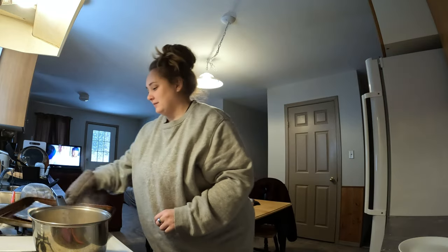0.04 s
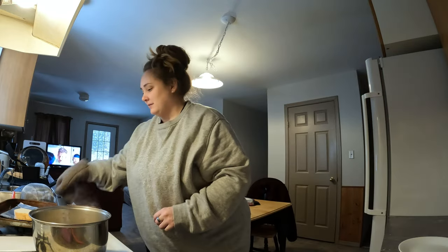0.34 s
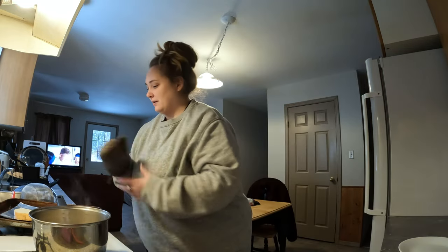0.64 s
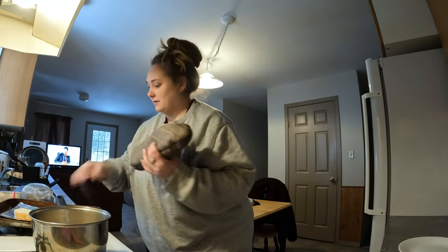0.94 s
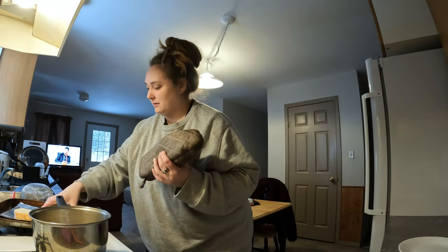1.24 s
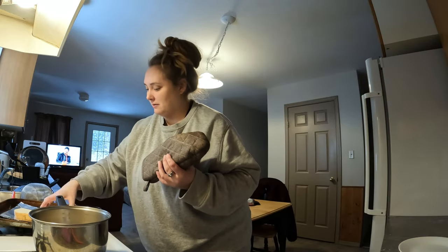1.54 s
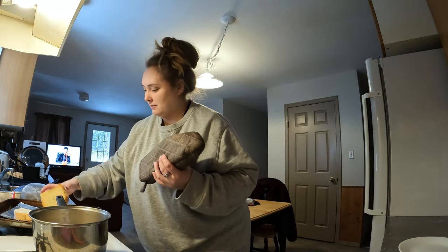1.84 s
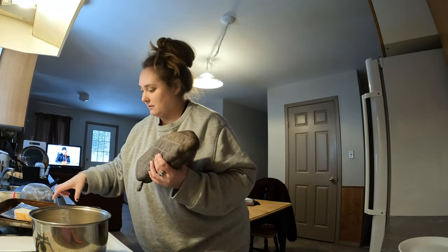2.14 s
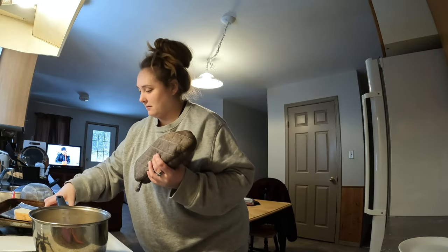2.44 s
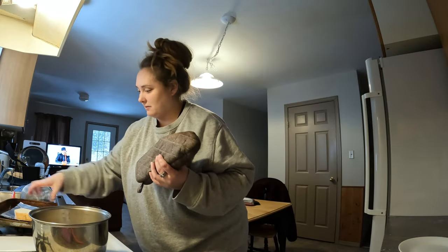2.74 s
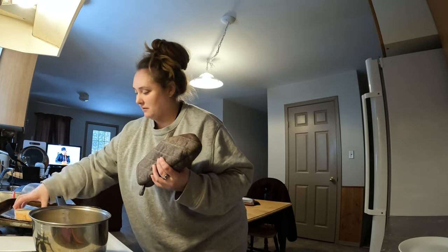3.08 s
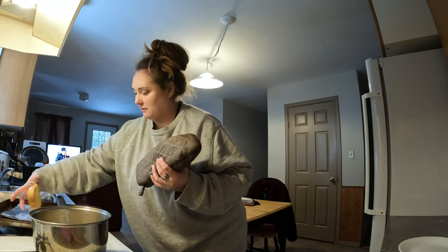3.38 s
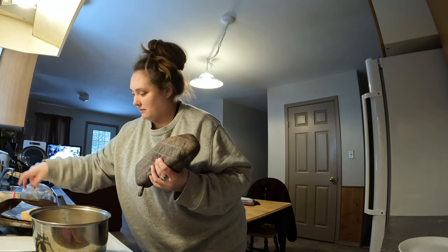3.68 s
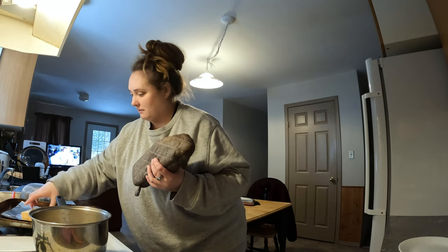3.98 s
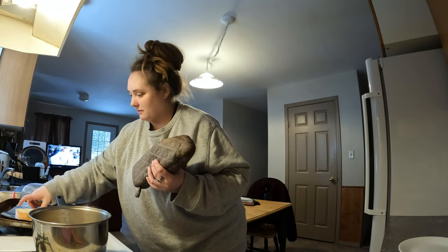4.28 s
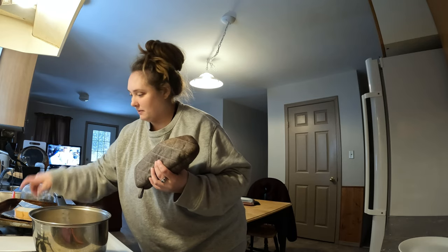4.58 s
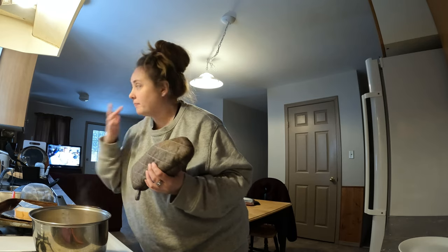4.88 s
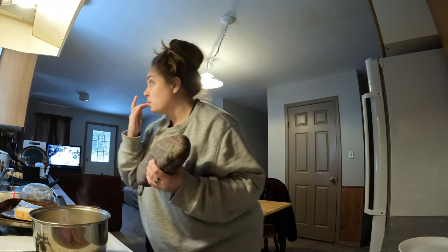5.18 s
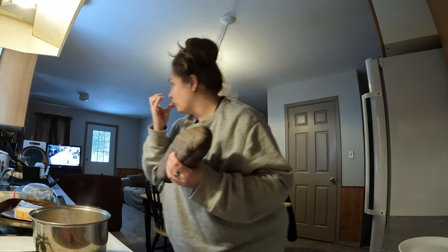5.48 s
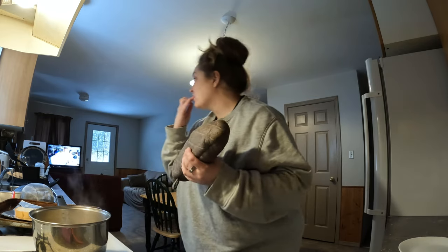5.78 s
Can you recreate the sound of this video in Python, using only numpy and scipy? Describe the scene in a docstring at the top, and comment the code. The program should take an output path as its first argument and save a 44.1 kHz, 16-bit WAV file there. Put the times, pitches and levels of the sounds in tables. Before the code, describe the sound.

A metal baking tray clatters on a kitchen counter, then paper crinkles, butter knocks twice into a pot, and lips smack softly.

```python
"""A metal baking tray, knocked by a spatula, clatters on a kitchen counter and rocks to rest.
Each blow is a crash of dense sheet modes, a ring and a counter thump. Butter is picked off crinkly
paper and two pieces knock into a damped steel pot; the paper drags, the butter dish ticks, and lips
suck and smack on a fingertip. The kitchen is small and hard, with a low appliance drone."""
import sys
import numpy as np
from scipy import signal
from scipy.fft import rfft, irfft, next_fast_len
from scipy.io import wavfile

SR = 44100
rng = np.random.default_rng(int(sys.argv[2]) if len(sys.argv) > 2 else 0)


def transcribe(u):
    """Save the signal u as a 16-bit wav file named by the first command-line argument.

    u: samples, shape (n,) or (channels, n), limited to [-1, 1]; the rate is SR.
    q: integer samples, one column per channel.
    """
    v = np.clip(np.atleast_2d(u).T, -1, 1)
    q = np.round(v * 32767).astype(np.int16)
    wavfile.write(sys.argv[1], SR, q)


N = 256662
TIME = np.arange(N) / SR
HZ = np.maximum(np.fft.rfftfreq(N, 1 / SR), 1)

# strongest tray modes: (frequency [Hz], relative level [dB], t60 [s])
TRAY_MODES = [(347, 6.5, .2), (542, 11.5, 0.21), (1182, -1.5, 0.3), (1276, -1.5, 0.35), (1476, 5, 0.17),
              (1570, -4, 0.35), (1915, -9, 0.65), (2204, 1.5, 0.2), (2576, 1.5, 0.1), (2720, -1, 0.1),
              (2920, -1, 0.1165), (3540, -1.5, 0.11), (3730, -4, 0.083), (4100, -17, .25),
              (4198, -12, 0.18), (4540, -21, 0.62), (4550, -17, 0.18)]


def undb(db):
    """Decibels to gain."""
    return 10 ** (np.asarray(db) / 20)


def unit(x):
    """Scale to rms 1."""
    return x / np.sqrt(np.mean(x ** 2) + 1e-18)


def add(out, start_s, x):
    """Mix x in at start_s."""
    i = max(int(start_s * SR), 0)
    out[i:i + len(x)] += x[:N - i]


def convolve(x, response):
    """Convolve with a response scaled to unit energy."""
    return signal.fftconvolve(x, response / np.linalg.norm(response))[:N]


def butter(x, hz, kind):
    """Second-order low-pass or high-pass."""
    return signal.sosfilt(signal.butter(2, hz, kind, fs=SR, output="sos"), x)


def colour(x, points, tilt_db_oct=0):
    """Minimum-phase (Hz, dB) filter, tilted above 400 Hz; white noise keeps its power."""
    size = next_fast_len(len(x) // 2 + 1024) * 2
    octave = np.log2(np.maximum(np.fft.rfftfreq(size, 1 / SR), 20))
    hz, db = np.transpose(points)
    curve_db = np.interp(octave, np.log2(hz), db) + tilt_db_oct * np.maximum(octave, np.log2(400))
    cepstrum = irfft(np.log(unit(undb(curve_db))))
    cepstrum[1:size // 2] *= 2
    cepstrum[size // 2 + 1:] = 0
    return irfft(rfft(x, size) * np.exp(rfft(cepstrum)))[:len(x)]


def band(hz, width_hz):
    """Noise in one resonance, rms 1."""
    return unit(irfft(rfft(rng.standard_normal(N)) / (1 + (2 * (HZ - hz) / width_hz) ** 2), N))


def grains(size, per_s, spread_db):
    """Random clicks, a few much larger than the rest; rms 1."""
    present = rng.random(size) < per_s / SR
    sign = rng.choice([-1, 1], size)
    strength = np.minimum(rng.exponential(size=size), 4)
    return unit(present * sign * undb(spread_db * strength))


def fade(t, t60_s):
    """Exponential decay."""
    return np.exp(-np.log(1000) * t / t60_s)


def ring(modes, detune, favoured_hz, focus_db_oct):
    """Damped modes, weighted toward favoured_hz; each beats with a weaker partner."""
    hz, db, t60_s = np.transpose(modes)[:, :, None]
    t = TIME[:SR]
    gain = undb(db - focus_db_oct * np.abs(np.log2(hz / favoured_hz)))
    partner_hz = hz + detune * np.sqrt(hz) * rng.standard_normal(hz.shape)
    main, partner = (np.sin(2 * np.pi * (f * t + rng.random(hz.shape))) for f in (hz, partner_hz))
    return (gain * (main + partner / 2) * fade(t, t60_s)).sum(0) / np.linalg.norm(gain)


def drone():
    """Appliances hum in the room's low resonances over a faint, wavering hiss."""
    # drone spectrum: (frequency [Hz], relative density [dB])
    spectrum = [(25, -30.5), (85, -8.5), (140, -4), (270, -3.5), (420, -12.5), (600, -13), (900, -19.5),
                (1250, -14.5), (2300, -24), (6600, -36), (9200, -46.5), (11700, -35.5), (14000, -60.5)]
    # room resonances: (frequency [Hz], width [Hz], level [dB])
    booms = [(95, 40, -66), (176.6, 5.8, -60), (278, 53, -60)]
    air_db = -52.5 + 0.5 * band(0, width_hz=6)
    air = colour(rng.standard_normal(N), spectrum) * undb(air_db)
    return air + sum(undb(db) * band(hz, width_hz) for hz, width_hz, db in booms)


def kitchen(x, wet_db, low_t60_s, high_t60_s):
    """Add dense echoes from cupboards and walls; the treble dies first."""
    t = TIME[:SR]
    echoes = grains(SR, per_s=6000, spread_db=1.7) * (1 - np.exp(-(t / 0.0045) ** 2))
    low = butter(echoes, 2500, "low") * fade(t, low_t60_s)
    high = butter(rng.permutation(echoes), 2500, "high") * fade(t, high_t60_s)
    return x + undb(wet_db) * convolve(x, low + high)


def dish(t60_s):
    """The butter dish ticks under the fingers: short, hand-damped rings."""
    # dish ticks: (time [s], level [dB], pitch [Hz])
    ticks = [(1.712, -47, 4930), (2.599, -49, 2870), (2.603, -50, 2480)]
    out = np.zeros(N)
    for s, db, hz in ticks:
        add(out, s, undb(db) * ring([(hz, 0, t60_s)], detune=1.8, favoured_hz=hz, focus_db_oct=0))
    return out


def lips():
    """Suction hisses in two resonances of a narrowing wet gap; the lips smack before and on parting."""
    # lip smacks: (time [s], level [dB], tilt [dB/oct])
    smacks = [(5.2373, -46.5, 8), (5.6237, -28.5, 4.5)]
    # wet lip spectrum: (frequency [Hz], relative density [dB])
    spectrum = [(300, 6), (1100, -2), (1600, 5.5), (2800, 3.5), (4200, -3), (6000, -0.5), (8000, -15),
                (11500, -20.5), (14000, -41)]
    close_s, slip_s, part_s = 5.29, 5.485, 5.615
    attack_s, slip_width_s, rise_db_per_s = 0.046, 0.055, 32
    narrowed = (1 + np.tanh((TIME - slip_s) / slip_width_s)) / 2  # the fingertip slips out
    whistle = (1 - narrowed) * band(5150, width_hz=300) + narrowed * band(6400, width_hz=900)
    fizz = colour(grains(N, per_s=4000, spread_db=2.6), spectrum)
    suction = np.clip((TIME - close_s) / attack_s, 0, 1)
    suction *= undb(-rise_db_per_s * np.maximum(part_s - TIME, 0))
    suction *= fade(np.maximum(TIME - part_s, 0), t60_s=0.35)
    out = suction * (undb(-54.5) * whistle + undb(-51) * fizz)
    t = TIME[:SR // 8]
    for s, db, tilt in smacks:
        burst = rng.standard_normal(len(t)) * fade(t, t60_s=0.035)
        add(out, s, undb(db) * colour(burst, spectrum, tilt))
    return out


def strokes(rows):
    """Gain of hand strokes: each presses in and eases off along an arch."""
    return sum(undb(db) * np.sin(np.pi * np.clip((TIME - s) / length_s, 0, 1)) ** 1.04
               for s, length_s, db in rows)


def paper():
    """Creases snap in click showers, fingers rustle, and dragging adds a dull stick-slip scrape."""
    # crease snaps: (time [s], level [dB], tilt [dB/oct], length [s])
    crinkles = [(1.463, -45, 1, 0.027), (1.563, -45, -1.5, 0.02), (1.7, -51, -4.5, 0.048),
                (1.967, -34, 0, 0.039), (1.984, -39.5, 16, 0.086), (2.562, -48.5, 2.5, 0.032),
                (2.596, -48.5, -5, 0.016), (2.838, -56.5, 9.5, 0.0093), (3.172, -52.5, 3.5, 0.018),
                (3.271, -45.5, -6, 0.033), (3.342, -47, 0, 0.02), (3.392, -41, -2, 0.012),
                (3.552, -32.5, -2.5, 0.038), (4.386, -44.5, 0, 0.028), (4.428, -47, -1.5, 0.025)]
    # paper spectrum: (frequency [Hz], relative density [dB])
    spectrum = [(200, -19), (600, -10), (1500, 4.5), (3000, 0.5), (5500, 3.5), (7500, 1), (9200, -7.5),
                (11500, 3.5), (13000, -11.5), (15000, -40)]
    # finger strokes: (start [s], length [s], level [dB])
    handling = [(1.42, .13, -50), (1.53, 0.23, -58), (2.48, 0.087, -59.5), (2.59, 0.085, -58),
                (3.15, .15, -53.5), (3.32, 0.098, -56.5), (3.5, 0.056, -57.5), (4.1, 0.33, -53),
                (4.37, 0.13, -52.5)]
    # drags over the tray: (start [s], length [s], relative level [dB])
    drags = [(3.23, 0.14, -44), (3.32, .23, -46.5), (4.16, 0.24, -42), (4.37, 0.13, -43.5)]
    # scrape spectrum: (frequency [Hz], relative density [dB])
    drag_spectrum = [(150, -24), (270, 4.5), (420, -10.5), (620, -1.5), (800, -13), (1500, -8),
                     (2400, -13.5), (4500, -28), (9000, -37)]
    out, t = np.zeros(N), TIME[:SR // 4]
    for s, db, tilt, length_s in crinkles:
        envelope = np.exp(-(t / length_s) ** 2) * (1 - np.exp(-t / 0.0035))
        shower = grains(len(t), per_s=5000, spread_db=1.3) * envelope
        add(out, s, undb(db) * colour(shower, spectrum, tilt))
    rustle = colour(grains(N, per_s=3300, spread_db=1.9) * strokes(handling), spectrum, tilt_db_oct=-1.4)
    scrape = colour(grains(N, per_s=1300, spread_db=1.4) * strokes(drags), drag_spectrum)
    return out + rustle + undb(-3) * scrape


def strikes(hits, modes, spectrum, detune, focus_db_oct, weight, contact_s, crash_t60_s,
            tail_db, tail_t60_s):
    """Each blow: a crash of dense modes, a duller tail, the object's ring and a counter thump."""
    # counter modes: (frequency [Hz], relative level [dB], t60 [s])
    counter_modes = [(81, -14, 1), (111, -16.5, 0.65), (144.7, -8.5, 0.35), (176.7, -1.5, 0.2),
                     (255.5, -3, 0.46), (303, 1.5, 0.19), (355.5, 5.5, .2), (388.3, -3, 0.23)]
    out, t = np.zeros(N), TIME[:SR]
    for s, db, tilt, ring_db, favoured_hz, thump_db in hits:
        crash = colour(grains(SR, per_s=9000, spread_db=2.64) * fade(t, crash_t60_s), spectrum, tilt)
        tail = colour(rng.standard_normal(SR) * fade(t, tail_t60_s), spectrum, tilt - 1.5)
        body = ring(modes, detune, favoured_hz, focus_db_oct) * (1 - np.exp(-t / 0.0015))
        # the counter responds slowly; only a heavy object reaches its deepest modes
        thump = ring(counter_modes, detune=0.98, favoured_hz=306, focus_db_oct=0.7 / weight)
        thump *= 1 - np.exp(-t / 0.0088)
        blow = crash + undb(tail_db) * tail + undb(ring_db) * body + undb(thump_db - 2) * thump
        rise_s = contact_s * undb(-0.3 * (db + 20.5))  # gentler blows stay in contact longer
        add(out, s, undb(db) * blow * (1 - np.exp(-t / rise_s)))
    return out


def pot(t60_s):
    """Butter slaps the base of a steel pot; the spot hit decides which modes ring."""
    # knocks: (time [s], level [dB], tilt [dB/oct], ring [dB], favoured pitch [Hz], relative thump [dB])
    hits = [(2.018, -21, 0.5, -1.5, 1260, -4.5), (2.024, -21, -5, 4.5, 835, -6),
            (2.043, -39, -15, -3, 820, 16), (2.16, -33, -6, -5, 880, -17),
            (3.606, -20.5, -1, -18, 1780, -22), (3.614, -22, 1, -11.5, 1410, -27),
            (3.622, -27.5, -4.5, 13, 570, -24), (3.685, -35, 4.5, -20, 1200, -6)]
    # pot modes, damped by the food: (frequency [Hz], relative level [dB])
    partials = [(255, -15), (484, -2.5), (565, 3.5), (600, -0.5), (805, 0.5), (920, -6.5), (1168, -18),
                (1292, -5.5), (1555, -14), (1755, -9), (2226, 4.5), (2542, -2)]
    # soft slap spectrum: (frequency [Hz], relative density [dB])
    slap_spectrum = [(100, -28.5), (200, -4.5), (380, -9), (700, -6.5), (1400, -5.5), (2400, -11),
                     (3500, -15), (6000, -16.5), (9000, -28), (11500, -21), (14000, -49)]
    modes = [(hz, db, t60_s) for hz, db in partials]
    return strikes(hits, modes, slap_spectrum, detune=0.99, focus_db_oct=10, weight=0.089,
                   contact_s=0.0007, crash_t60_s=0.19, tail_db=-18, tail_t60_s=0.34)


def rocking():
    """Small contacts keep the tray ringing as it slowly loses height, then lies flat."""
    # contact spectrum: (frequency [Hz], relative density [dB])
    spectrum = [(40, -11), (85, -2.5), (200, -8), (360, 4.5), (450, -3.5), (560, 2.5), (750, -11.5),
                (1280, -8), (1900, -9), (2800, -20), (4400, -23), (9000, -41.5), (13000, -48)]
    start_s, flat_s = 0.43, 0.98
    start_db, sag_db_per_s, stop_db_per_s = -38.5, 17, 104
    lost_db = sag_db_per_s * (TIME - start_s) + stop_db_per_s * np.maximum(TIME - flat_s, 0)
    contacts = grains(N, per_s=2500, spread_db=2.1) * undb(start_db - lost_db) * (TIME >= start_s)
    sheet = ring(TRAY_MODES, detune=0.41, favoured_hz=1800, focus_db_oct=6)
    return colour(contacts, spectrum) + undb(-15) * convolve(contacts, sheet)


def tray():
    """Blows on the metal sheet; harder, brighter contact wakes higher modes."""
    # blows: (time [s], level [dB], tilt [dB/oct], ring [dB], relative thump [dB])
    blows = [(0.001, -12.5, -3.5, -7.5, 2.5), (0.013, -23, -2, 4.5, 0), (0.049, -25.5, 4.5, 2, -4),
             (0.139, -12, 1.5, 1, 2.5), (0.153, -14, 0.5, -6, 0.5), (0.21, -38.5, 1.5, -12, 15),
             (0.272, -20, -1, -0.5, -5.5), (0.311, -23, -1.5, -3, -7), (0.318, -24, -3, -2.5, -2),
             (0.4274, -36, 2, 5, -8), (0.46, -31, 0, -6, 3), (0.578, -37, -3, -1.5, -6),
             (0.673, -42.5, -0.5, -2, -19), (0.704, -37.5, -3.5, -5, -13), (0.74, -38, -4, -15, -2),
             (0.873, -50, 9, -12, -2), (4.44, -47, -13.5, 1, 12)]
    # dense sheet modes: (frequency [Hz], relative density [dB])
    sheet_spectrum = [(100, -17), (300, -2.5), (450, -4), (1000, -3.5), (1400, -1), (2600, 0.5),
                      (4500, -6.5), (6500, -13.5), (9000, -29), (11500, -26.5), (14000, -49)]
    neutral_hz, oct_per_tilt = 2320, 0.15
    hits = [(s, db, tilt, ring_db, neutral_hz * 2 ** (oct_per_tilt * tilt), thump_db)
            for s, db, tilt, ring_db, thump_db in blows]
    return strikes(hits, TRAY_MODES, sheet_spectrum, detune=0.6, focus_db_oct=6, weight=0.81,
                   contact_s=0.0011, crash_t60_s=0.14, tail_db=-13, tail_t60_s=0.61)


def scene():
    """The kitchen at two close microphone ports that differ mainly in top treble and deep bass."""
    knocks = tray() + pot(t60_s=0.18)
    quiet = paper() + dish(t60_s=0.05) + lips()
    loud = kitchen(knocks + rocking(), wet_db=-5.5, low_t60_s=0.43, high_t60_s=0.3)
    mid = loud + kitchen(quiet, wet_db=-3.5, low_t60_s=0.51, high_t60_s=0.29) + drone()
    scatter = grains(SR // 25, per_s=20000, spread_db=0.68)  # reflections differ between the ports
    side_db = np.interp(HZ, [25, 125, 2000, 5000, 9000, 12000], [-16, -44, -41, -29, -23, -4])
    side = irfft(rfft(convolve(mid, scatter)) * undb(side_db), N)
    return np.array([mid + side, mid - side])


def record(dry):
    """The microphone drops the deep bass, its ports notch the treble, and the top is cut."""
    bass_hz, notch_hz, top_hz = 50, 9120, 14400
    thinned = butter(dry, bass_hz, "high")
    notched = signal.lfilter(*signal.iirnotch(notch_hz, Q=20, fs=SR), thinned)
    return signal.sosfilt(signal.ellip(8, 0.2, 70, top_hz, fs=SR, output="sos"), notched)


dry = scene()
out = record(dry)
transcribe(out)
```